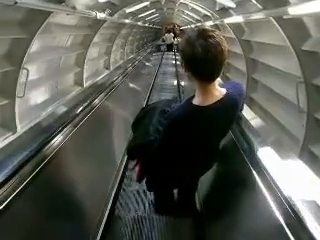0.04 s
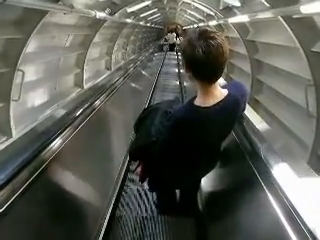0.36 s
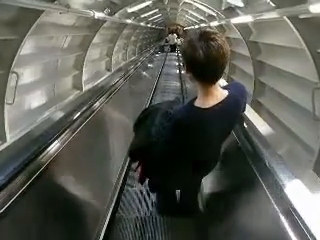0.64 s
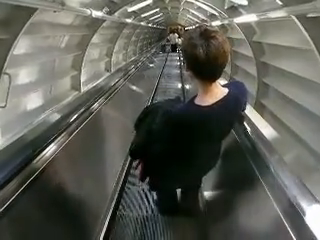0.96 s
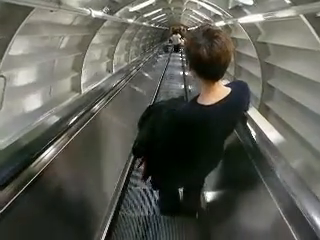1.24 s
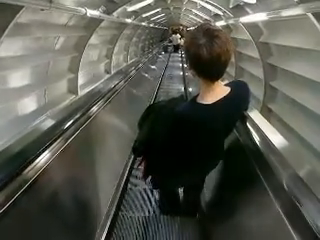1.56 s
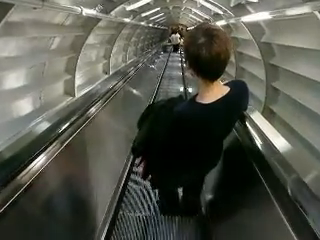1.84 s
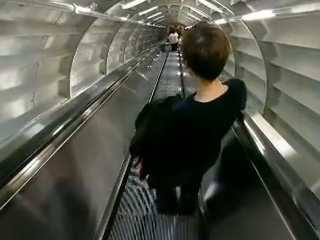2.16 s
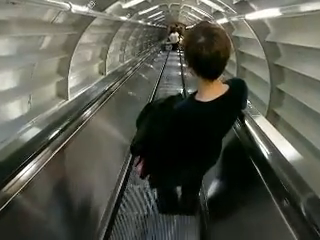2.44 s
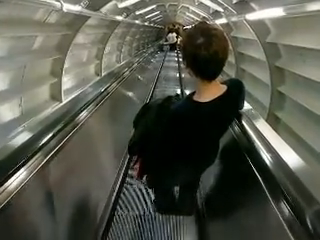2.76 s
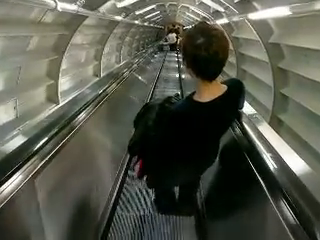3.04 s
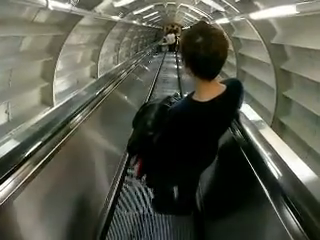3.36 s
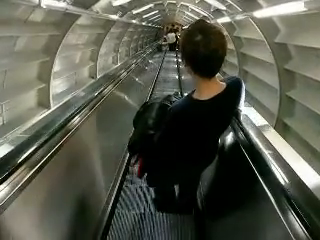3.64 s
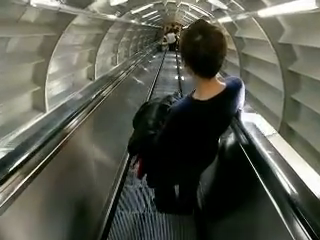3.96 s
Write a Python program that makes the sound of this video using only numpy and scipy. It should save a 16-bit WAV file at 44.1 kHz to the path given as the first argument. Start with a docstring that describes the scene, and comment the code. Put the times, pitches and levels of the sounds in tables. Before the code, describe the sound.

An escalator rumbles steadily with a wavering whine and hum inside a long tunnel.

```python
"""An even rumble with a high whine on top: riding an escalator down a long metal-lined tunnel.
The rumble comes from the steps and rollers. The drive gears whine and hum, with extra tones
beside them spaced by the turning shaft, and the frame drones and throbs as the chain runs.
Now and then a step scuffs or rings, and a few soft bumps sound close by.
The sound also has one tiny dry click."""
import sys
import numpy as np
from scipy import signal
from scipy.fft import rfft, irfft
from scipy.io import wavfile

SR = 44100
rng = np.random.default_rng(int(sys.argv[2]) if len(sys.argv) > 2 else 0)


def put_to_file(sound):
    """Save the sound as 16-bit audio at rate SR, in the file named by the first command-line argument."""
    columns = np.atleast_2d(sound).T  # one column per channel
    safe = np.clip(columns, -1, 1)
    whole_steps = np.round(safe * 32767)
    wavfile.write(sys.argv[1], SR, whole_steps.astype(np.int16))


N = 176400
T = np.arange(N) / SR


def from_db(db):
    """Turn decibels into a number to multiply a sound by."""
    return 10 ** (np.asarray(db) / 20)


def rms_one(x):
    """Scale a signal so its average size (rms) is 1."""
    return x / np.sqrt(np.mean(x ** 2) + 1e-20)


def level(rows):
    """Join (t/s, level/dB) points into a volume curve."""
    return from_db(np.interp(T, *np.transpose(rows)))


def drift(rate):
    """A smooth random wander of about size 1; a higher rate wanders faster."""
    hop, warm_up = 100, 1000
    pole = np.exp(-2 * np.pi * rate * hop / SR)
    white = rng.standard_normal(N // hop + warm_up + 2)
    slow = signal.lfilter([1], [1, -2 * pole, pole * pole], white)[warm_up:]
    return np.interp(np.arange(N) / hop, np.arange(len(slow)), rms_one(slow - slow.mean()))


def noise(spectrum):
    """Noise shaped by (f/Hz, level/dB) points and fading beyond both ends; rms 1."""
    hz, db = np.transpose(spectrum)
    f = np.maximum(np.fft.rfftfreq(N, 1 / SR), 1)
    shape = from_db(np.interp(np.log(f), np.log(hz), db))
    edges = np.minimum(1, hz[-1] / f) ** 10 * np.minimum(1, f / hz[0])
    return rms_one(irfft(rfft(rng.standard_normal(N)) * shape * edges, N))


def flicker(x, depth_db, rate):
    """Let each octave of a sound waver in level on its own."""
    octave = np.log2(np.clip(np.fft.rfftfreq(N, 1 / SR), 64, 4096))
    spectrum = rfft(x)
    bands = (irfft(spectrum * np.maximum(0, 1 - abs(octave - k)), N) for k in range(6, 13))
    return sum(band * from_db(depth_db * drift(rate)) for band in bands)


def tone(hz, waver_db=1.2, jitter_hz=0.8):
    """A machine tone that wavers in level and pitch as the tunnel's echoes shift; rms 1."""
    phase = 2 * np.pi * (np.cumsum(hz + jitter_hz * drift(6)) / SR + rng.random())
    return rms_one(np.sin(phase) * from_db(waver_db * np.tanh(drift(2.5))))


# the pitches in the frame's drone: f/Hz, relative level/dB
FRAME_SPECTRUM = [(240, -31), (278, -1.5), (300, -5), (320, -1.5), (355, -30.5)]
# how loud the frame drones: t/s, level/dB
FRAME_LOUDNESS = [(0, -50.5), (.5, -34.5), (1, -32), (1.3, -33.5), (1.75, -27.5), (2.05, -37),
                  (2.35, -29.5), (2.65, -36), (2.85, -32), (3.3, -32), (4, -35)]
def frame_drone():
    """The frame shakes along with the hum, throbbing unevenly as the chain runs."""
    throb_hz = 22 + 2.5 * drift(4.5)
    throb = 1 + 0.44 * np.cos(2 * np.pi * np.cumsum(throb_hz) / SR)
    return level(FRAME_LOUDNESS) * rms_one(noise(FRAME_SPECTRUM) * throb)


# each ring of a step: t/s, level/dB, f/Hz
STEP_RINGS = [(2.55, -28, 412), (2.56, -30.5, 215), (2.98, -32.5, 407), (3.07, -32.5, 208.6)]
def step_rings(swell_s=0.095):
    """A step swells into a brief ring and fades again."""
    return sum(from_db(db) * np.exp(-((T - s) / swell_s) ** 2) * tone(hz) for s, db, hz in STEP_RINGS)


# the pitches in a scuff: f/Hz, relative level/dB
SCUFF_SPECTRUM = [(200, -18), (450, -5.5), (700, -5), (1150, 0.5), (1600, -9.5), (2100, -18), (2800, -12.5),
                  (3500, -22), (4400, -62.5), (7000, -82.5)]
# each scuff: t/s, hold/s, level/dB
STEP_SCUFFS = [(1.057, 0.022, -33), (1.899, 0.074, -24)]
def step_scuffs(rise_s=0.044, fade_s=0.6):
    """A step rubs the side panel, and the sound dies away in the tunnel."""
    volume = np.zeros(N)
    for s, hold_s, db in STEP_SCUFFS:
        rise = np.clip((T - s) / rise_s, 0, 1)
        fading_for = np.maximum(T - s - rise_s - hold_s, 0)
        volume += from_db(db) * rise * from_db(-60 * fading_for / fade_s)
    return volume * noise(SCUFF_SPECTRUM)


# each bump: t/s, level/dB before its rise and fade, f/Hz, time to fade by 60 dB/cycles
SOFT_BUMPS = [(.472, -19, 52, 2.5), (.667, -4.5, 834, 10.4), (1.085, -31, 44.6, 3), (2.013, -8, 80, 3.1),
              (3.001, -13.5, 238, 22), (3.626, -37, 85, 5)]
def bumps(rise_cycles=0.47):
    """Thuds and taps: a soft contact starts a vibration that quickly dies."""
    out = np.zeros(N)
    for s, db, hz, ring_cycles in SOFT_BUMPS:
        cycles = np.maximum(T - s, 0) * hz
        contact = 1 - np.exp(-(cycles / rise_cycles) ** 2)
        fade = from_db(-60 * cycles / ring_cycles)
        out += from_db(db) * contact * fade * np.sin(2 * np.pi * cycles)
    return out


def click(at_s=2.021, dull_hz=2000):
    """One tiny dry click: a single spike with its treble softened."""
    spike = np.zeros(N)
    spike[int(at_s * SR)] = from_db(-19.5)
    return signal.lfilter([1], [1, -np.exp(-2 * np.pi * dull_hz / SR)], spike + 1e-18)


# faint steady tones of the machinery: f/Hz, level/dB
FAINT_TONES = [(60, -61.5), (87, -58), (415, -43.5), (899.5, -41)]
def motor_tones(hz=996, beat_s=0.43, peak_at_s=1.19):
    """Two close motor tones pulse as they slip in and out of step, over fainter machine tones."""
    beat = np.cos(np.pi * (T - peak_at_s) / beat_s)  # splits one tone into a close pair
    pair = from_db(-36) * tone(hz, waver_db=-2.4, jitter_hz=0.98) * beat
    return pair + sum(from_db(db) * tone(f, waver_db=5.5, jitter_hz=1.63) for f, db in FAINT_TONES)


SHAFT_HZ = 16.6  # turns of the drive shaft each second
# how loud the drive hums: t/s, level/dB
HUM_LOUDNESS = [(0, -47), (.7, -44), (.88, -36), (1.2, -31.5), (1.42, -28.5), (1.56, -32.5), (1.78, -27.5),
                (1.94, -31.5), (2.15, -28.5), (2.5, -37), (3.05, -40), (3.35, -29), (3.6, -35.5), (4, -33)]
def drive_hum(hz=301.1):
    """The drive hums low, and the turning shaft adds a weaker tone on either side."""
    sides = sum(tone(f, jitter_hz=1.63) for f in (hz - SHAFT_HZ, hz + SHAFT_HZ))
    return level(HUM_LOUDNESS) * (tone(hz) + from_db(-8.5) * sides)


# how loud the gears whine: t/s, level/dB
WHINE_LOUDNESS = [(0, -17), (.1, -33), (.15, -21), (.22, -19.5), (.32, -23.5), (.41, -28), (.55, -29.5),
                  (.67, -31.5), (.74, -21.5), (.84, -23.5), (.95, -34.5), (1.06, -22), (1.15, -31),
                  (1.42, -31), (1.53, -24.5), (1.63, -37), (1.85, -34), (2.03, -27), (2.29, -40),
                  (2.68, -32), (2.9, -38.5), (3.3, -39.5), (3.5, -30.5), (3.72, -36), (3.95, -32), (4, -24)]
# how loud the tone just below the whine is: t/s, level/dB
SIDE_TONE_LOUDNESS = [(0, -40.5), (.4, -35), (.8, -42), (1, -42), (1.45, -40), (1.72, -31), (2, -38),
                      (2.4, -35), (2.8, -46), (3.3, -41), (3.6, -32.5), (3.9, -47)]
def gear_whine(hz=917.4, waver_db=-2.4, jitter_hz=0.98):
    """The gears give a slightly rough whine, and the turning shaft adds a tone just below it."""
    whine = level(WHINE_LOUDNESS) * tone(hz, waver_db, jitter_hz)
    roughness = 1 + 0.21 * drift(30)
    side_tone = level(SIDE_TONE_LOUDNESS) * tone(hz - 2 * SHAFT_HZ, waver_db, jitter_hz)
    return whine * roughness + side_tone


# the pitches in the noise of the moving steps: f/Hz, relative level/dB
RUNNING_SPECTRUM = [(25, -28), (45, -27.5), (85, -13.5), (140, -4.5), (210, -1), (300, 1.4), (480, 0.2),
                    (750, 0.36), (1100, -3), (1450, -8), (1750, -13.5), (1950, -20), (2200, -20),
                    (2600, -13.5), (2950, -11.5), (3250, -15), (3550, -22.5), (3850, -34), (4100, -41.5),
                    (4400, -57), (5300, -58), (6200, -65), (7500, -75.5)]
# the pitches in the rollers' deep rumble: f/Hz, relative level/dB
ROLLER_SPECTRUM = [(60, -36), (130, -20), (215, 4), (290, -4.5), (350, -3), (420, -5.5), (560, -7.5),
                   (900, -38)]
# how loud the rollers rumble: t/s, level/dB
ROLLER_LOUDNESS = [(0, -35.5), (.7, -38), (1.5, -33), (2.2, -31.5), (2.55, -36), (2.8, -28), (3.03, -35.5),
                   (3.25, -35), (3.55, -34.5), (4, -35)]
def steps_and_rollers():
    """The tunnel blends the moving steps into an even noise, while the rollers swell beneath it."""
    running = from_db(-22.5) * flicker(noise(RUNNING_SPECTRUM), depth_db=0.34, rate=16)
    return running + level(ROLLER_LOUDNESS) * noise(ROLLER_SPECTRUM)


def scene():
    """The escalator as heard from one step, plus the click, in one channel."""
    machine = steps_and_rollers() + gear_whine() + drive_hum() + motor_tones() + frame_drone()
    return (machine + step_rings() + step_scuffs() + bumps() + click())[None]


def record(dry):
    """Cut away the very highest treble."""
    cutoff_hz = 16000
    return signal.sosfilt(signal.cheby2(12, 70, cutoff_hz, fs=SR, output="sos"), dry)


dry = scene()
out = record(dry)
put_to_file(out)
```